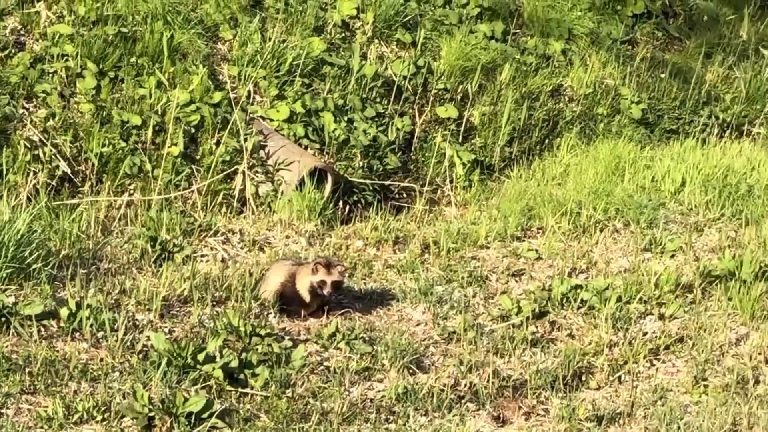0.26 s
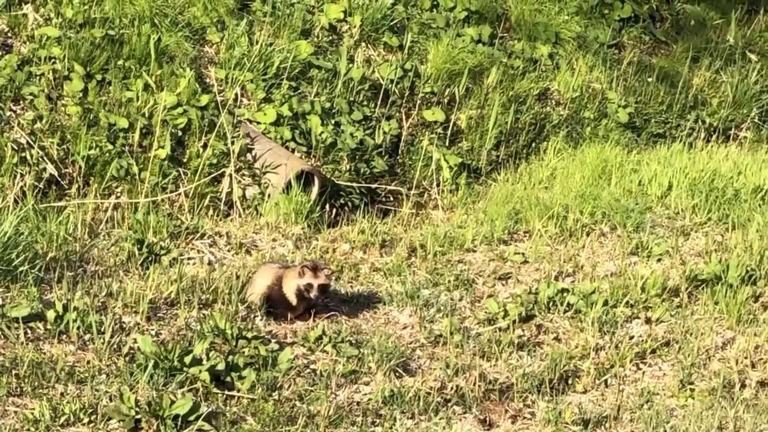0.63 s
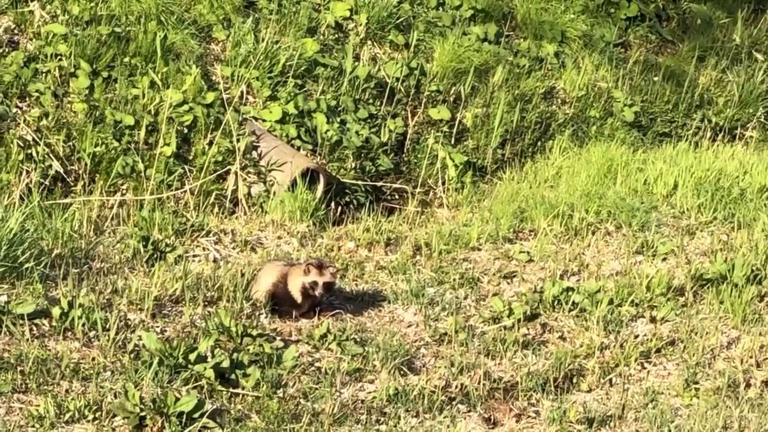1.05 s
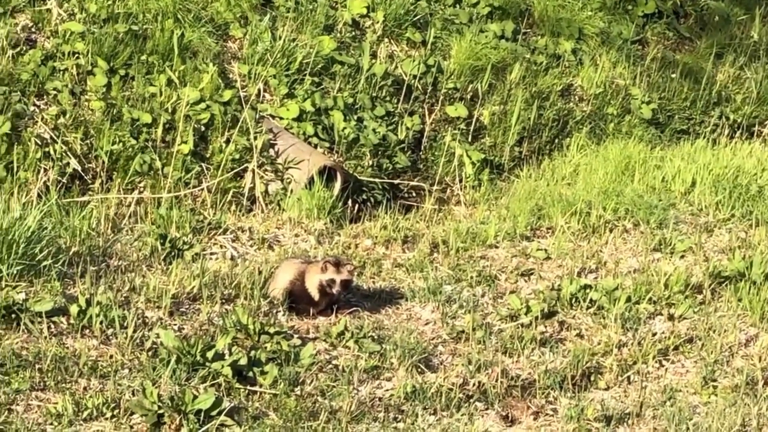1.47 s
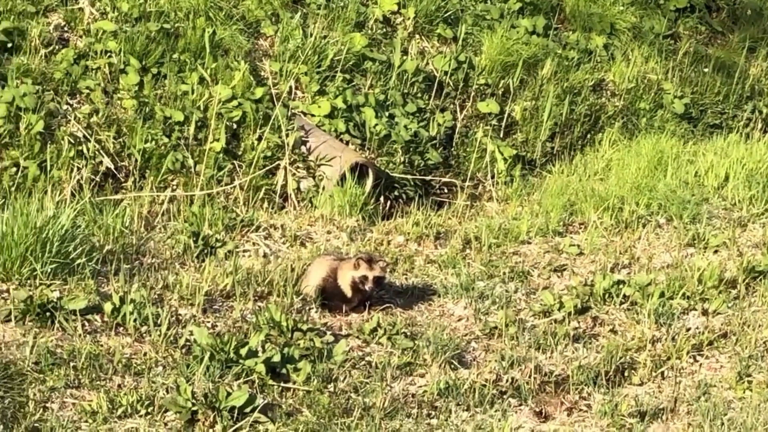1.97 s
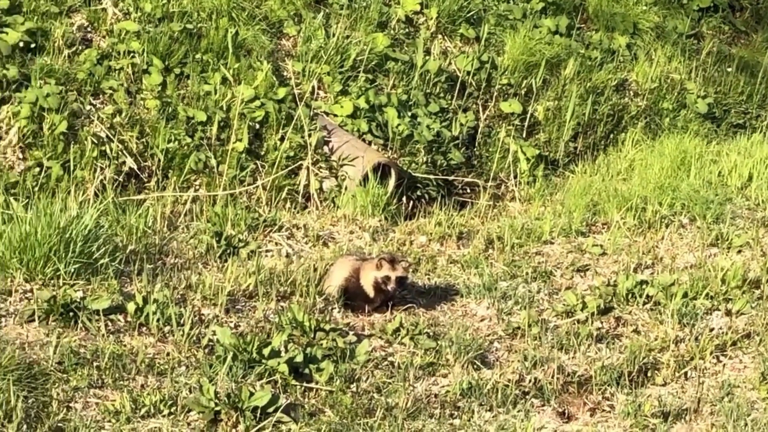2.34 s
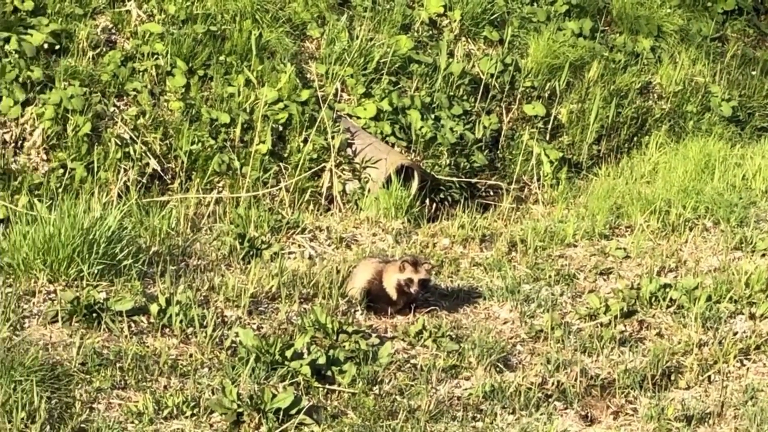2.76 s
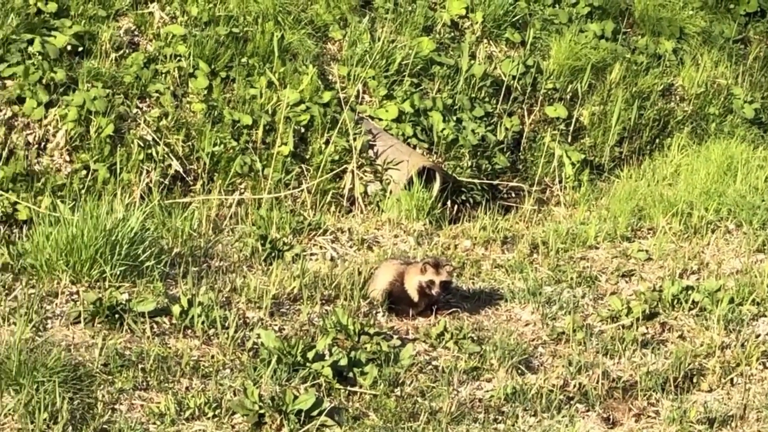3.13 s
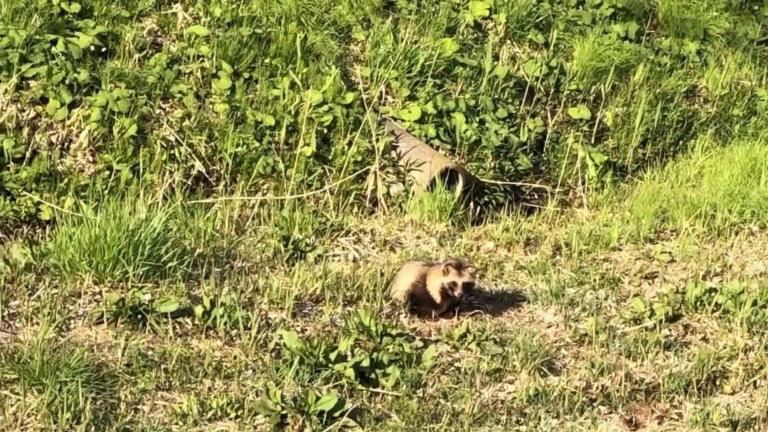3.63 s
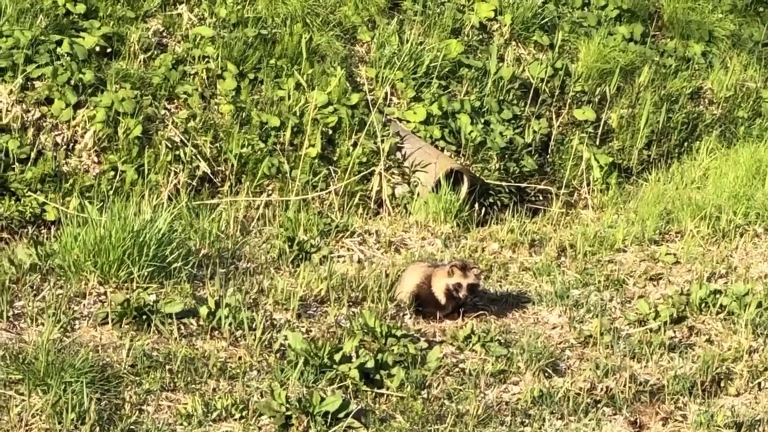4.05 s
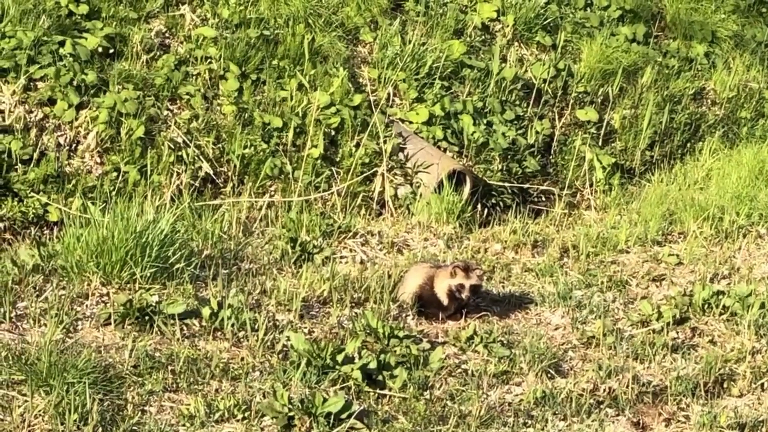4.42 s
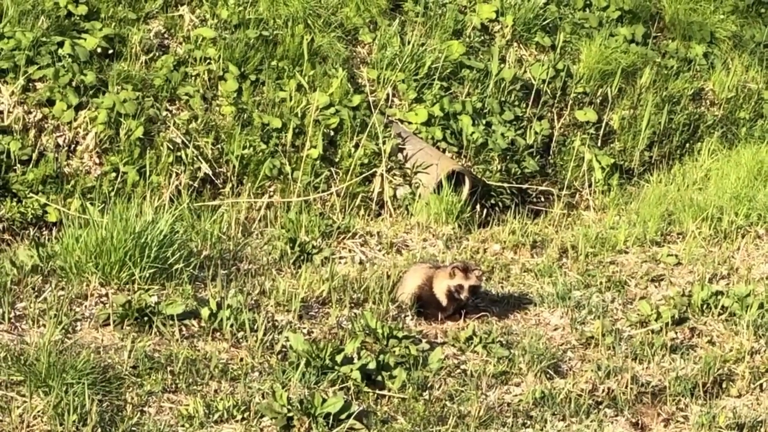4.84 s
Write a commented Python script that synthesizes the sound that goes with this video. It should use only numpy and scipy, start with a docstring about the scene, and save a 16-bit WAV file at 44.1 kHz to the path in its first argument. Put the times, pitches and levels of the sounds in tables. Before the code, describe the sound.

A young raccoon dog calls from sunlit grass a few metres away. The sound opens on the tail of a cry, with a few short yelps until 0.16 s. Further chattering bursts come at about 0.6-0.95, 1.15-1.45, 1.6-1.9, 2.3-2.65, 3.1-3.5, 3.9-4.15 and 4.55-4.75 s. Most yelps last 20-50 milliseconds, some 15 to 20 a second, arching up to roughly 900-1250 Hz with bright, nasal overtones. Lower, breathy, hoarse slides mingle with them, and the final burst is all rough, low squeaks. Ground, bank and drain pipe add a brief, faint echo. Low traffic rumble, a barely audible motor hum and thin whine, and hiss continue underneath. Soft dull knocks fall near 4.06 and 4.47 s. The mono sound is grainy, lightly saturated, with a harsh mirrored treble on the cries, and cuts to silence at 4.85 s.

```python
"""A young raccoon dog chatters in the grass a few metres away: bursts of yelps, each an arch of pitch, and
mostly hoarse slides, made of overtones and breath through throat resonances plus a separate fundamental.
Ground, bank and drain pipe return a brief noise-tail echo; shaped noise is low traffic rumble with recorder
hiss, three sines a faint motor, and two decaying sines are soft knocks. Quarter-rate 8-bit sampling mirrors
the voice in the treble; the sound stops short."""
import sys
import numpy as np
from scipy import signal
from scipy.fft import rfft, irfft
from scipy.io import wavfile
from scipy.ndimage import uniform_filter1d

SR = 44100
rng = np.random.default_rng(int(sys.argv[2]) if len(sys.argv) > 2 else 0)


def persist_wave(psi):
    """Save psi, clipped to +-1, as 16-bit WAV."""
    counts = np.round(np.clip(psi, -1, 1) * 32767).astype(np.int16)
    wavfile.write(sys.argv[1], SR, np.atleast_2d(counts).T)


def gain_from_decibels(decibels):
    """Convert decibel values to linear amplitude factors."""
    exponent = np.asarray(decibels, float) / 20
    return 10 ** exponent


N = 224424

# clear arched yelps, nominal levels ahead of the preamp:
# (start [s], length [ms], top pitch [Hz], level [dB], fundamental re overtones [dB])
YELPS = [(0.024, 38, 930, -16.5, -21), (0.08, 27.4, 953, -16.5, -19.5), (0.621, 23.5, 1138, -18.5, -17),
         (0.673, 36, 1241, -14.5, -11.5), (0.734, 35, 1202, -15, -11.5), (0.796, 30.3, 1204, -13.5, -13),
         (0.857, 38.3, 1202, -15.5, -10), (0.914, 27.2, 1185, -15, -13.5), (1.137, 32, 919, -17.5, -13),
         (1.192, 24.5, 1124, -12.5, -20.5), (1.245, 24, 1217, -9.5, -19), (1.299, 28, 1217, -10, -16.5),
         (1.355, 45.8, 1155, -12, -21), (1.417, 22.4, 1033, -11, -21), (1.44, 19.8, 929, -22.5, -14.5),
         (1.631, 27, 970, -14, -16), (1.685, 32.3, 1182, -11, -23.5), (1.739, 48, 1151, -10.5, -22),
         (1.789, 40.6, 1124, -12, -19), (1.856, 19.2, 902, -13, -20.5), (2.306, 27.4, 1070, -15, -19),
         (2.363, 41.6, 1069, -12, -19.5), (2.435, 39.5, 1041, -14, -16), (2.503, 46, 1124, -15.5, -11.5),
         (2.571, 38, 1105, -16.5, -11.5), (3.111, 27, 1149, -12.5, -12), (3.168, 28.7, 1249, -10.5, -12),
         (3.222, 32, 1149, -11.5, -13), (3.282, 31.5, 1202, -10.5, -14.5),
         (3.345, 40.2, 1153, -12.5, -13.5), (3.41, 31.4, 1119, -12.5, -13),
         (3.491, 23.8, 1092, -14.5, -13.5), (3.942, 39.8, 1226, -9.5, -20),
         (4.034, 41.5, 1130, -12.5, -17.5)]
# cries that slide or stay nearly level in pitch, mostly hoarse, nominal levels ahead of the preamp;
# the first row is the cut-off tail of an earlier cry:
# (start [s], length [ms], first pitch [Hz], last pitch [Hz], level [dB], fundamental re overtones [dB])
SLIDES = [(0, 2.36, 867, 800, -18.5, -11.5), (0.066, 11.3, 687.5, 733, -12.5, -22.5),
          (0.14, 15.3, 777, 715.7, -15, -20.5), (0.586, 34, 523, 667, -18.5, -21.5),
          (2.268, 20, 919.3, 860, -22, -14), (2.624, 27.7, 660, 616, -15, -11.5),
          (3.078, 33, 589, 851, -16.5, -15.5), (3.463, 32, 785, 870, -14, -18),
          (3.885, 37, 777, 670, -21.5, -11), (4.015, 20, 1064, 1104, -10.5, -30.5),
          (4.108, 18, 1200, 898, -12, -23), (4.553, 29, 739.7, 870, -24.5, -10),
          (4.617, 49, 484.4, 549, -16.5, -17.5), (4.664, 37.2, 630, 702.4, -13, -15.5),
          (4.71, 33, 635, 520, -14.5, -16)]
# mouth in each burst; slope above 2 kHz is for a cry at -15.5 dB, flatness 2 is round, 5 flat-topped:
# (in force from [s], slope below 2 kHz [dB/octave], slope above [dB/octave], lift near 3.6 kHz [dB],
#  arch flatness [exponent], pitch at a yelp's start [share of its top])
BURSTS = [(0, 9.5, 8.5, -3.5, 2.2, .79), (.5, -11, 8.5, -2, 4.5, .63), (1.1, -7, -6.5, 9.5, 4., 0.57),
          (1.6, -2, -12.5, 8, 2.69, 0.65), (2.2, 0, 8.5, 0.5, 2.3, 0.58), (3, 30, 3, -9, 3., .7),
          (3.8, 3.5, -1.5, 7, 2.3, .7), (4.5, 8, -7.5, -6.5, 3.22, 0.68)]
# throat and mouth resonances: (centre [Hz], width [Hz], gain [dB])
THROAT = [(1733, 550, 3.5), (2228, 946, 1.5), (3153, 818, -4.5), (3638, 537, -9), (4840, 1900, -31)]
# resonances that the echo favours: (centre [Hz], width [Hz], relative gain [dB])
PIPE = [(800, 340, -6), (1688, 35, -1.5), (2062, 680, -5), (3250, 1760, -2.5)]
# background noise spectrum, low traffic rumble and recorder hiss: (frequency [Hz], relative density [dB])
BACKGROUND = [(15, -69.5), (25, -12), (33, -18), (118, -5), (355, -10.5), (509, -17), (730, -13),
              (798, -17), (1470, -22), (2050, -28), (5400, -30), (7020, -70.5), (11900, -120)]
# motor hum and whine: (mean frequency [Hz], mean level [dB rms])
WHINE = [(113.0, -49.5), (721.4, -50), (1437, -55)]
# soft low knocks: (start [s], peak before decay [dB], frequency [Hz], decay constant [s])
KNOCKS = [(4.061, -23.5, 325, 0.018), (4.473, -21.5, 325, 0.0078)]

# shares of the top pitch: end of a yelp, start of a slurred one, start and end of one that opens a burst
END_SHARE, SLUR_SHARE, LEAD_START_SHARE, LEAD_END_SHARE = .77, .75, .8, .68
LEAD_FLAT = 2.1  # a yelp that opens a burst is a round arch
# base roughness: of a yelp topping at CLEAR_HZ, gained per octave lower, of a slide
CLEAR_HZ, YELP_ROUGH, ROUGH_PER_OCTAVE, SLIDE_ROUGH = 1200, .06, .25, .28
SLUR_S, PAUSE_S = .008, .1  # shorter gaps are slurred, longer ones part the bursts
FADE_S = .0023
EARLY_DB, EARLY_T60_S, ECHO_DB, ECHO_T60_S = -10, .05, -20, .2
BACKGROUND_DB = -38
OFFSET, STEPS_PER_UNIT = -.0126, 128
STOP_S = 4.8468


def resonate(x, peaks):
    """Parallel resonances, neighbours in opposite sign so that the valleys stay filled."""
    out = 0
    for k, (hz, width_hz, db) in enumerate(peaks):
        b, a = signal.iirpeak(hz, hz / width_hz, fs=SR)
        out = out + (-1) ** k * gain_from_decibels(db) * signal.lfilter(b, a, x)
    return out


def wobble(hz):
    """Noise low-passed at hz, spread 1."""
    x = signal.sosfilt(signal.butter(2, hz, fs=SR, output="sos"), rng.standard_normal(N))
    return x / x.std()


def vocal_controls():
    """Pitch, roughness, strength, fundamental, spectral slopes, lift and onset snap of the folds over time."""
    hz, rough, size, hum_db, below_db, above_db, lift_db, snap = np.zeros((8, N))
    cries = sorted(YELPS + SLIDES)
    starts = [row[0] for row in cries] + [N]
    ends = [0] + [row[0] + row[1] / 1000 for row in cries]
    for k, cry in enumerate(cries):
        start_s, length_ms = max(cry[0], 0), cry[1]
        mouth = [burst for burst in BURSTS if burst[0] <= start_s][-1]
        _, below, above, lift, flat, start_share = mouth
        a = int(start_s * SR)
        u = np.linspace(-1, 1, int(length_ms * SR / 1000))  # -1 start, 0 middle, 1 end
        b = a + len(u)
        tail = slice(b, b + 1500)
        gap_before_s = start_s - ends[k]
        gap_after_s = starts[k + 1] - ends[k + 1]
        leads = gap_before_s > PAUSE_S
        if cry in YELPS:
            top_hz, db, fundamental_db = cry[2:]
            if leads:
                first, last, flat = LEAD_START_SHARE, LEAD_END_SHARE, LEAD_FLAT
            else:
                first = start_share if gap_before_s > SLUR_S else SLUR_SHARE
                last = END_SHARE
            hz[a:b] = top_hz * np.where(u < 0, first, last) ** (np.abs(u) ** flat)
            base_rough = max(YELP_ROUGH + ROUGH_PER_OCTAVE * np.log2(CLEAR_HZ / top_hz), 0)
        else:
            first_hz, last_hz, db, fundamental_db = cry[2:]
            hz[a:b] = first_hz * (last_hz / first_hz) ** ((u + 1) / 2)
            base_rough = SLIDE_ROUGH
        # folds are unsteady where they start and stop, but not inside a slurred pair
        unslurred = np.where(u < 0, SLUR_S < gap_before_s < PAUSE_S, gap_after_s > SLUR_S)
        edge = unslurred * np.exp(-((np.abs(u) - .85) / .2) ** 2)
        rough[a:b] = base_rough + .2 * edge
        # smooth cries hold or gain level at the end, rough ones die away
        size[a:b] = gain_from_decibels(db + edge * np.where(u < 0, 1.5, 1.5 - 22 * base_rough))
        if leads:
            # swells in, soft and dark
            size[a:b] *= np.clip((u + 1) / 1.25, 0, 1)
            above -= 7
        elif gap_before_s > SLUR_S:
            snap[a] = gain_from_decibels(db)
        # last state of the folds fades over a few ms
        fade = np.exp(-np.arange(1500) / SR / FADE_S)
        hz[tail] = hz[b - 1]
        rough[tail] = base_rough + .3
        size[tail] = size[b - 1] * fade
        # more effort, brighter voice
        below_db[a:b + 1500] = below
        above_db[a:b + 1500] = above + .5 * (db + 15.5)
        lift_db[a:b + 1500] = lift
        # fundamental is strongest mid-cry
        hum_db[a:b] = fundamental_db + 4.5 - 9 * u ** 2
        hum_db[tail] = fundamental_db - 6.5
    hz = uniform_filter1d(hz, size=60)
    size = uniform_filter1d(size, size=40)
    return hz, rough, size, hum_db, below_db, above_db, lift_db, snap


def voice():
    """Overtones, scattered and breathy where rough, pass the throat; fundamental and onset puffs bypass it."""
    hz, rough, size, hum_db, below_db, above_db, lift_db, snap = vocal_controls()
    scatter = rough * wobble(350)
    phase = 2 * np.pi * np.cumsum(hz * (1 + .2 * scatter)) / SR
    folds = 0
    for k in range(2, 12):
        overtone_hz = k * hz
        octaves = np.log2(np.maximum(overtone_hz, 1) / 2000)
        slope_db = np.where(octaves < 0, below_db, above_db) * octaves
        colour_db = slope_db + lift_db * np.exp(-((overtone_hz - 3620) / 250) ** 2)
        folds = folds + (overtone_hz < 5400) * gain_from_decibels(colour_db) * np.cos(k * phase)
    # breath comes in puffs once a cycle; its treble follows the mouth
    air = wobble(1800) + gain_from_decibels(0.54 * above_db + .5 * lift_db - 2.5) * wobble(5400)
    # smooth cries carry almost no breath, rough ones much
    breath = 3.2 * rough ** 2 * (1 + np.cos(phase)) * air
    source = folds * (1 + rough * wobble(230)) + breath
    # loudness stays even while the harmonics cross the resonances
    even = np.sqrt(uniform_filter1d(resonate(source, THROAT) ** 2, size=700) + 1e-9)
    throat = resonate(size * source / even, THROAT)
    # the fundamental scatters half as much
    steady_phase = 2 * np.pi * np.cumsum(hz * (1 + .1 * scatter)) / SR
    hum = uniform_filter1d(size * gain_from_decibels(hum_db), size=150) * np.sqrt(2) * np.cos(steady_phase)
    # a puff of air escapes as the folds burst open
    puff_decay = np.exp(-1 / (0.0062 * SR))
    puff = gain_from_decibels(-8.5) * signal.lfilter([1], [1, -puff_decay], snap) * wobble(1100)
    return throat + hum + puff


def echo(x):
    """Quick scatter from the ground close by, a longer faint tail from the bank and the pipe."""
    t = np.arange(SR // 3) / SR
    response = 0
    for db, t60_s in ((EARLY_DB, EARLY_T60_S), (ECHO_DB, ECHO_T60_S)):
        decay = np.exp(-np.log(1000) * t / t60_s)
        tail = resonate(rng.standard_normal(len(t)) * decay, PIPE)
        response = response + gain_from_decibels(db) * tail / np.sqrt(np.sum(tail ** 2))
    return signal.fftconvolve(x, response)[:N]


def background():
    """Low traffic rumble and recorder hiss: one spectrally shaped noise whose level swells slowly."""
    f = np.maximum(np.arange(N // 2 + 1) * SR / N, 1)
    hz, db = np.transpose(BACKGROUND)
    colour = gain_from_decibels(np.interp(np.log(f), np.log(hz), db))
    noise = irfft(rfft(rng.standard_normal(N)) * colour, N)
    noise = noise / np.sqrt(np.mean(noise ** 2))
    return gain_from_decibels(BACKGROUND_DB + 0.46 * wobble(3.9)) * noise


def motor():
    """Faint hum and whine: sines wavering in pitch and level."""
    out = np.zeros(N)
    for hz, db in WHINE:
        phase = 2 * np.pi * np.cumsum(hz + 4 * wobble(60)) / SR
        out += gain_from_decibels(db + 2 * wobble(12)) * np.sqrt(2) * np.sin(phase)
    return out


def knocks():
    """Soft knocks: low sines that start at once and decay exponentially."""
    t = np.arange(N) / SR
    out = np.zeros(N)
    for start_s, db, hz, decay_s in KNOCKS:
        envelope = (t > start_s) * np.exp(-np.abs(t - start_s) / decay_s)
        out += gain_from_decibels(db) * envelope * np.sin(2 * np.pi * hz * (t - start_s))
    return out


def scene():
    """Voice, its echo, background noise, motor and knocks, as one channel."""
    call = voice()
    return (call + echo(call) + background() + motor() + knocks())[None]


def low_pass(x):
    """Removes everything above the highest recorded frequency."""
    return signal.sosfilt(signal.butter(12, 10250, fs=SR, output="sos"), x)


def record(dry):
    """Lopsided saturating preamp, 8-bit steps at a quarter rate, treble cut, hard clipping, sudden stop."""
    x = signal.lfilter(*signal.butter(1, 8, "high", fs=SR), dry + 0.23 * dry ** 2)
    x = 1.28 * np.tanh(x / 1.268)
    x = signal.sosfilt(signal.butter(4, 4900, fs=SR, output="sos"), x)[:, ::4]
    x = np.round((x + OFFSET) * STEPS_PER_UNIT) / STEPS_PER_UNIT
    # held samples leave a mirror image of the spectrum above the quarter-rate band
    x = signal.resample_poly(np.repeat(x, 2, axis=1), 2, 1, axis=1)[:, :N]
    x = signal.sosfilt(signal.butter(3, 9600, fs=SR, output="sos"), x)
    x = signal.sosfilt(signal.ellip(10, .3, 70, 10250, fs=SR, output="sos"), x)
    x = np.clip(x, -1, 1) * (np.arange(N) < STOP_S * SR)
    return low_pass(x)


dry = scene()
out = record(dry)
persist_wave(out)
```